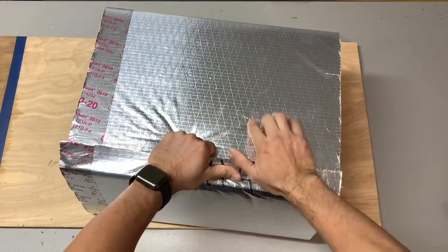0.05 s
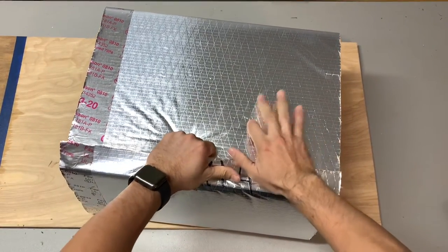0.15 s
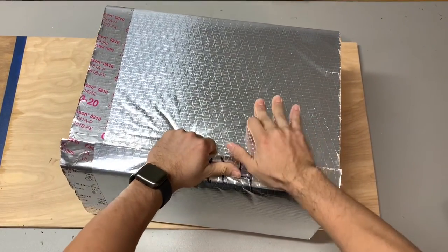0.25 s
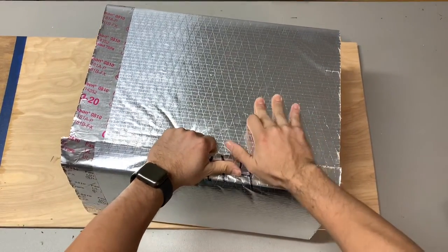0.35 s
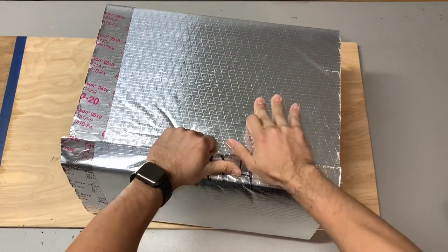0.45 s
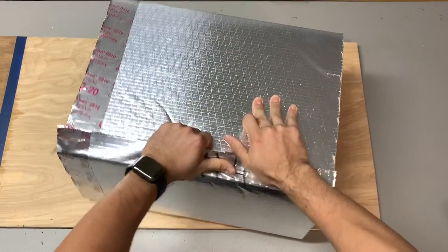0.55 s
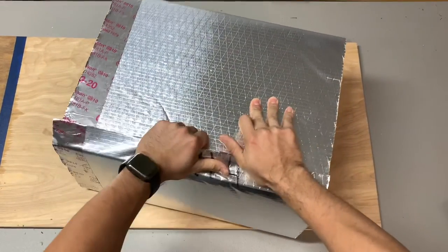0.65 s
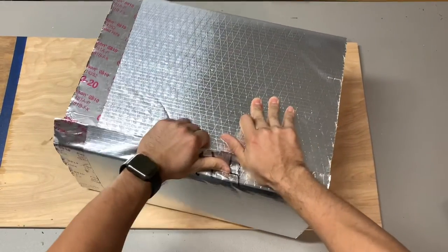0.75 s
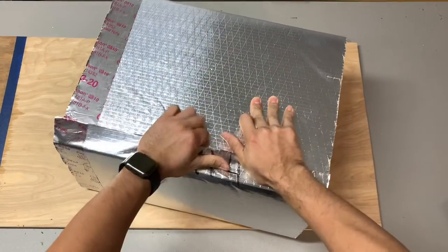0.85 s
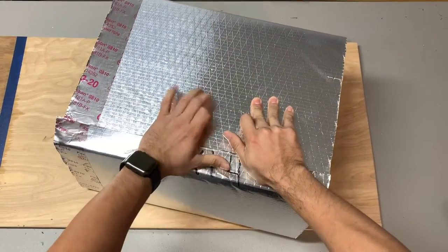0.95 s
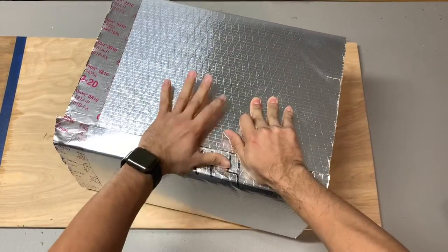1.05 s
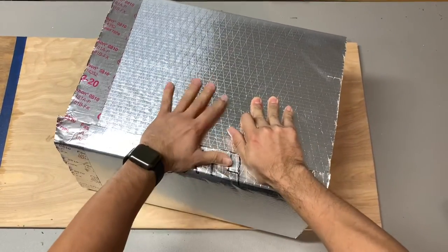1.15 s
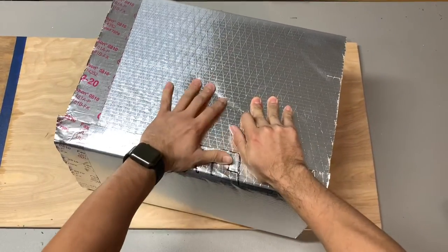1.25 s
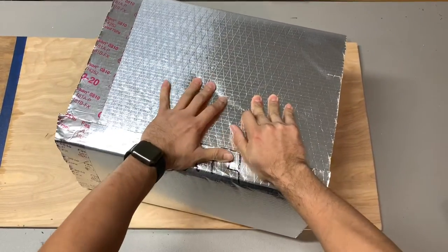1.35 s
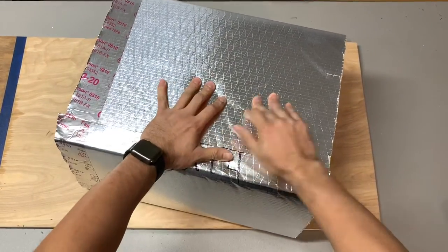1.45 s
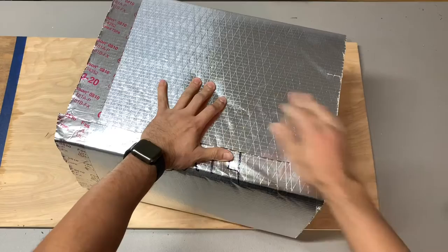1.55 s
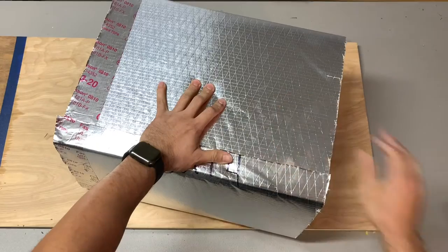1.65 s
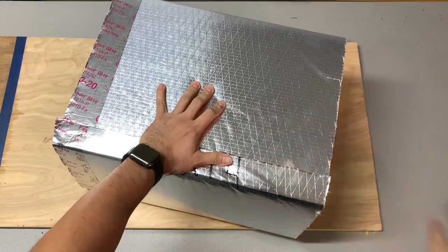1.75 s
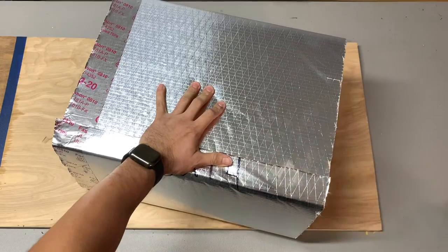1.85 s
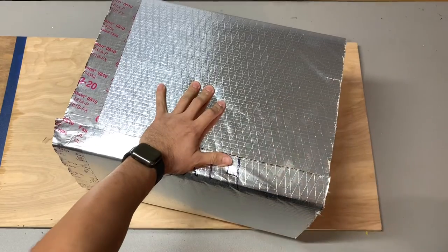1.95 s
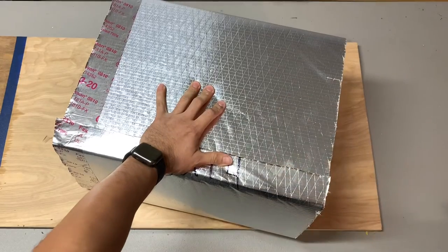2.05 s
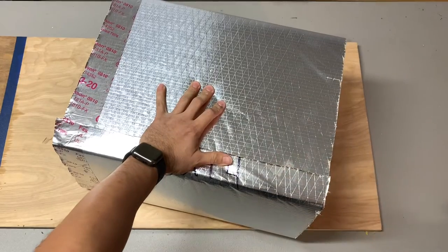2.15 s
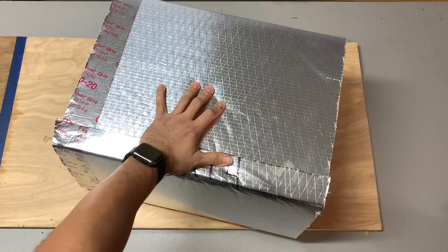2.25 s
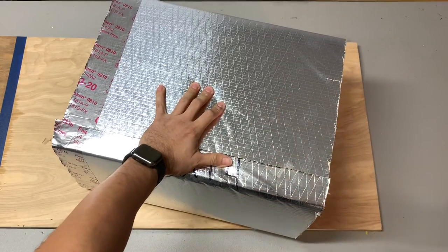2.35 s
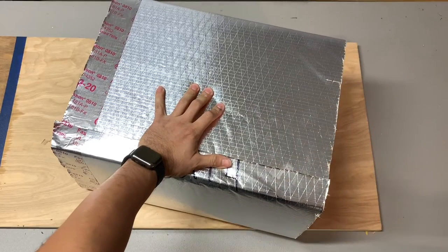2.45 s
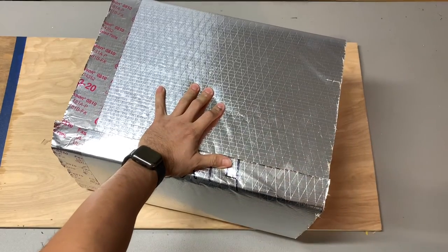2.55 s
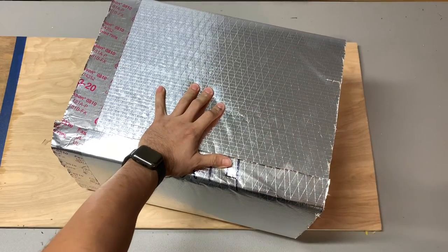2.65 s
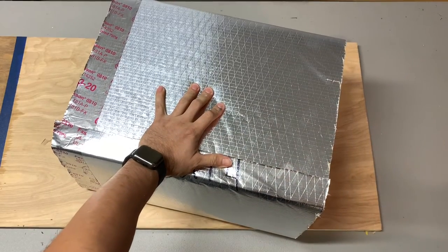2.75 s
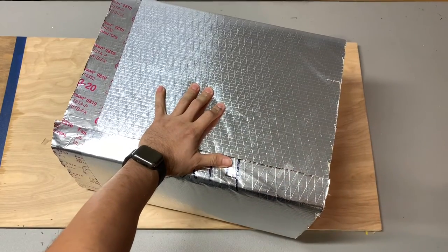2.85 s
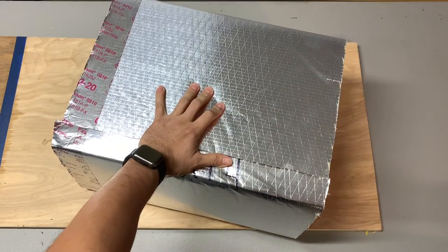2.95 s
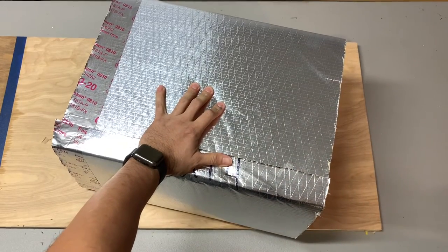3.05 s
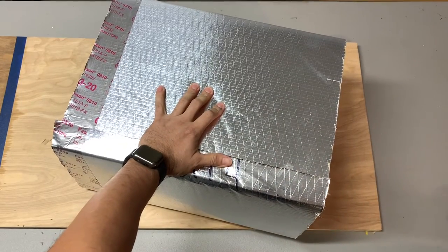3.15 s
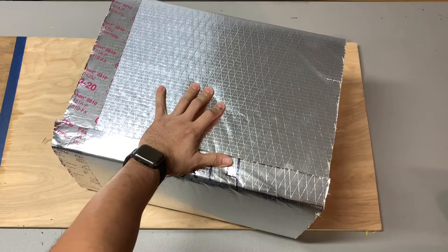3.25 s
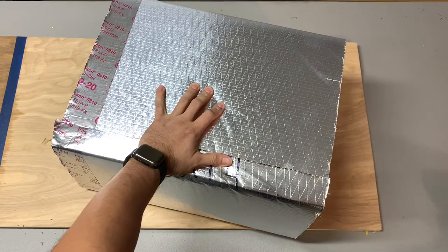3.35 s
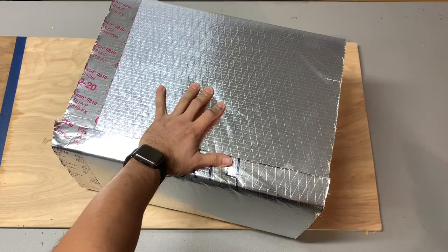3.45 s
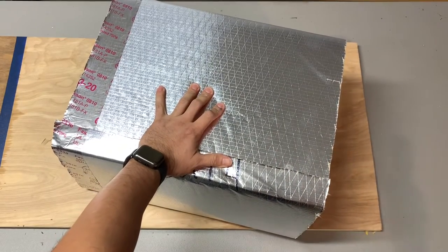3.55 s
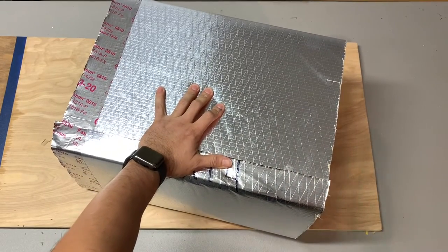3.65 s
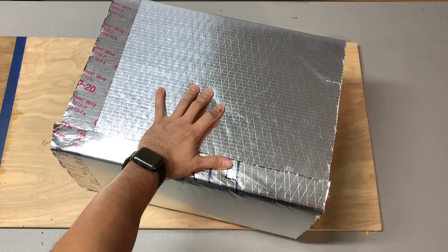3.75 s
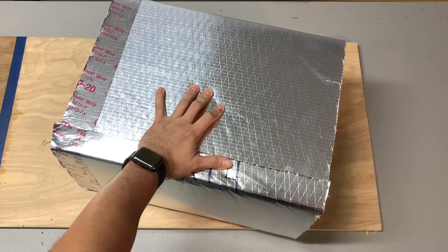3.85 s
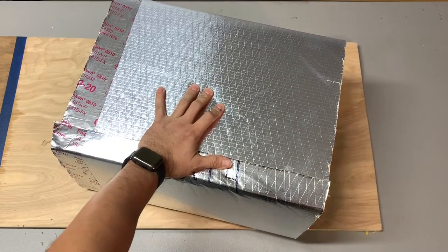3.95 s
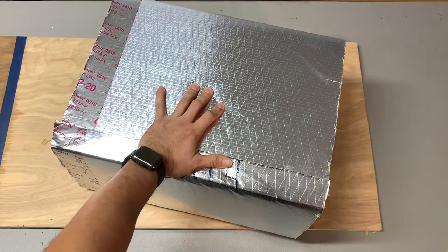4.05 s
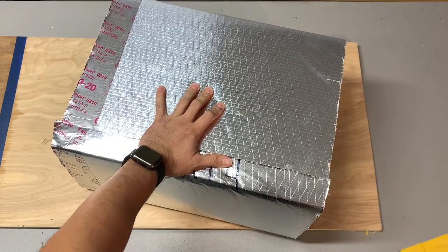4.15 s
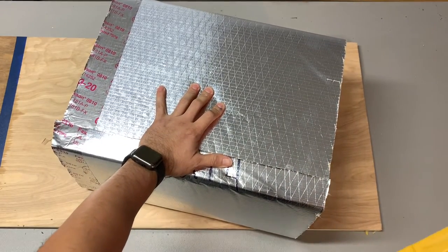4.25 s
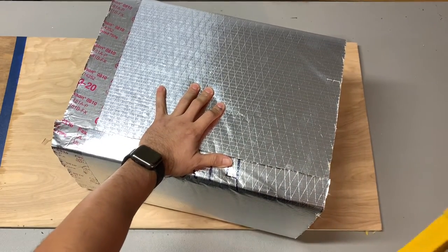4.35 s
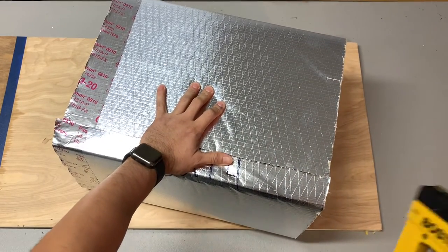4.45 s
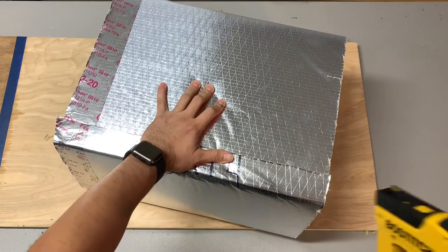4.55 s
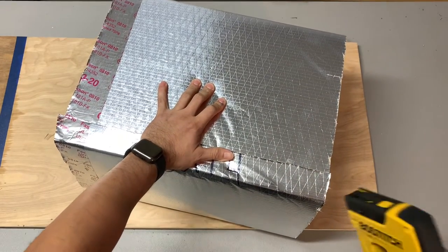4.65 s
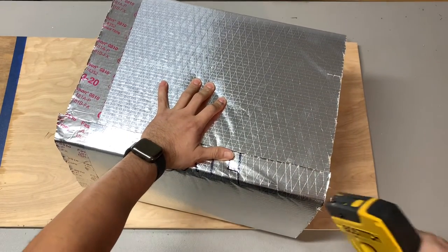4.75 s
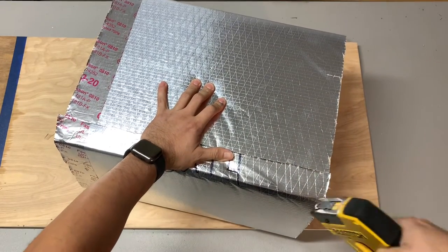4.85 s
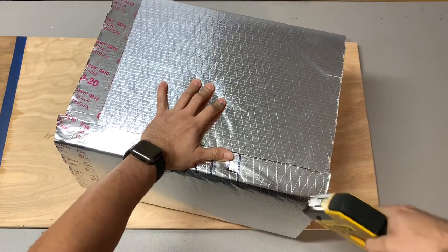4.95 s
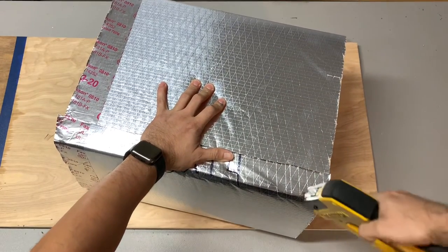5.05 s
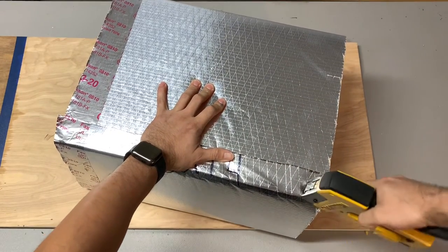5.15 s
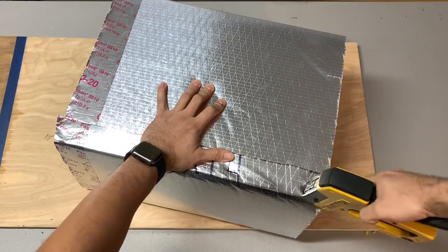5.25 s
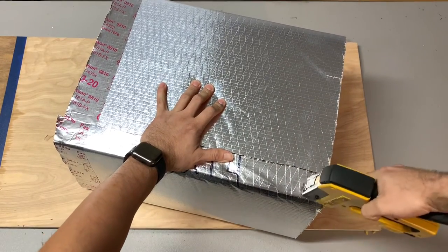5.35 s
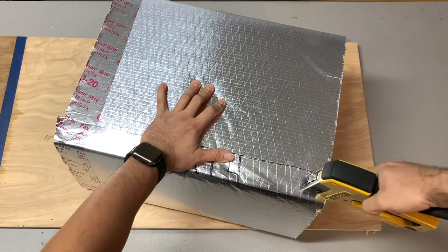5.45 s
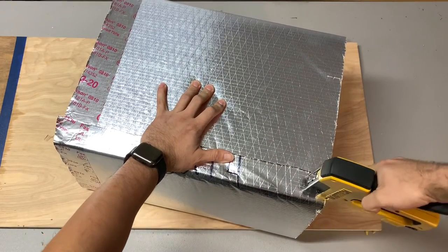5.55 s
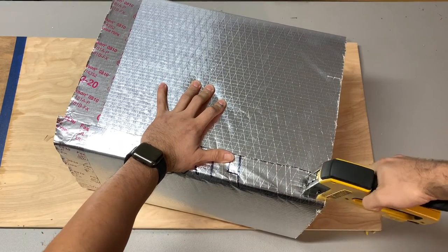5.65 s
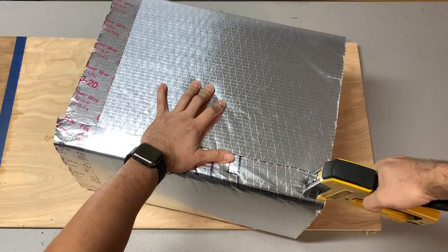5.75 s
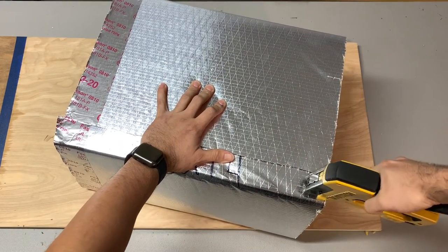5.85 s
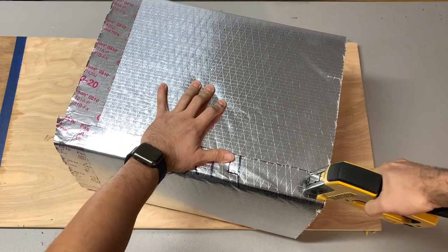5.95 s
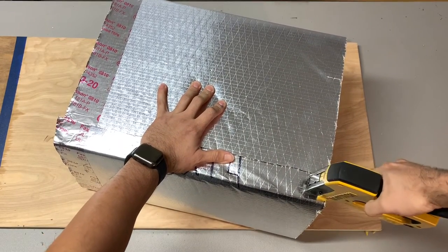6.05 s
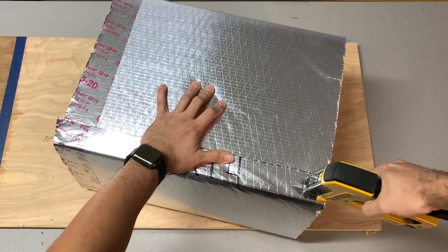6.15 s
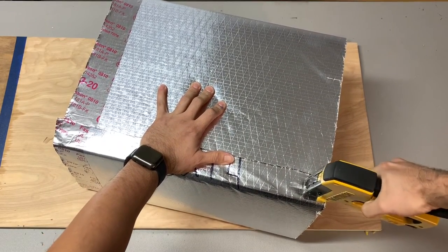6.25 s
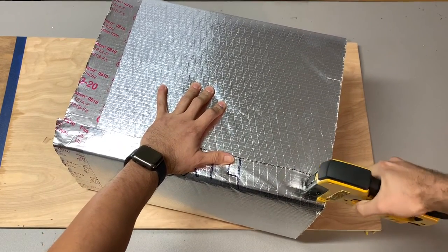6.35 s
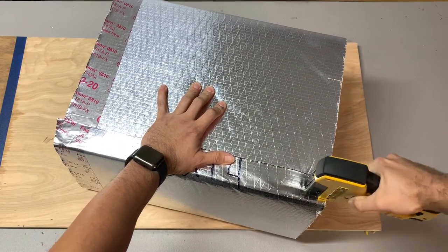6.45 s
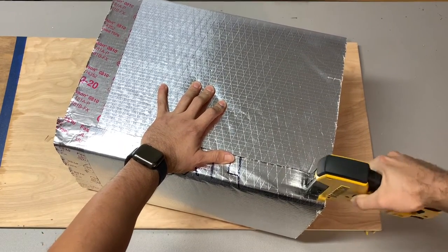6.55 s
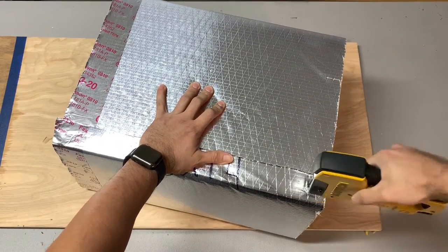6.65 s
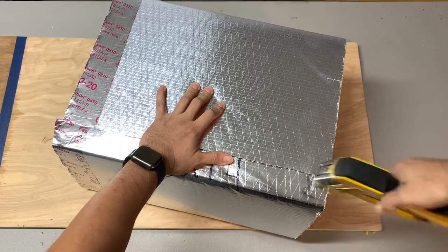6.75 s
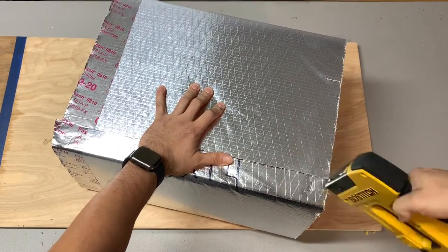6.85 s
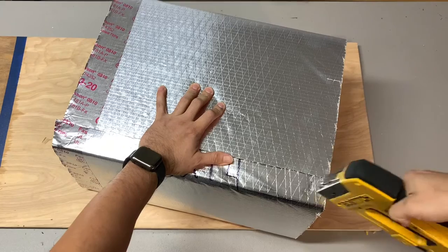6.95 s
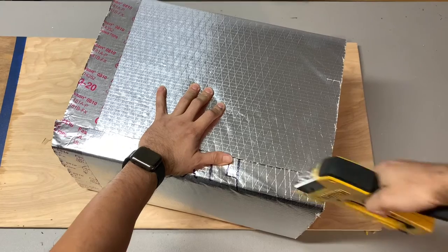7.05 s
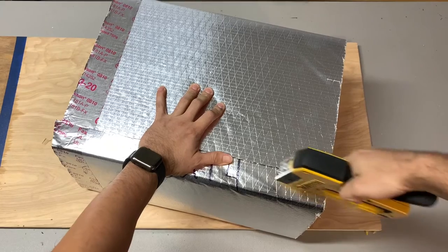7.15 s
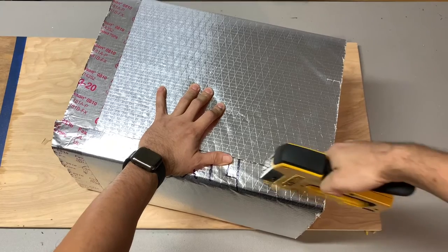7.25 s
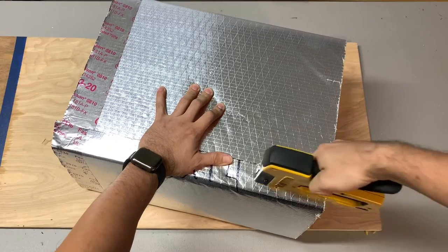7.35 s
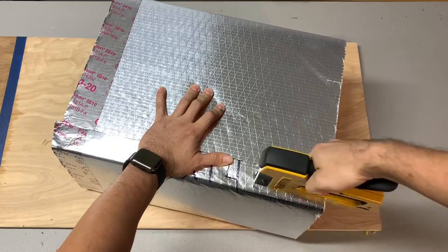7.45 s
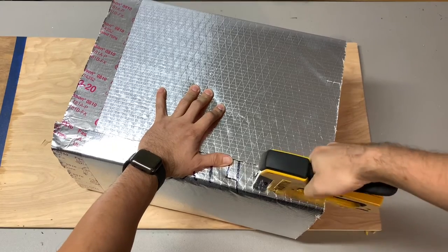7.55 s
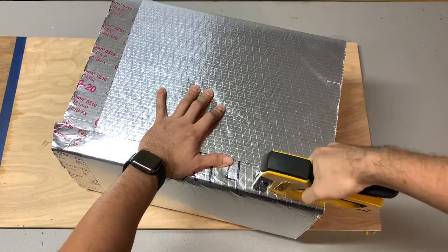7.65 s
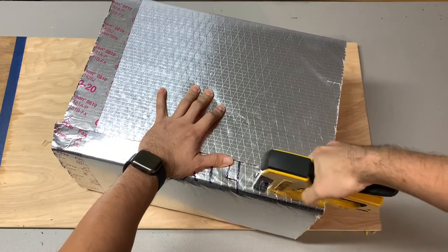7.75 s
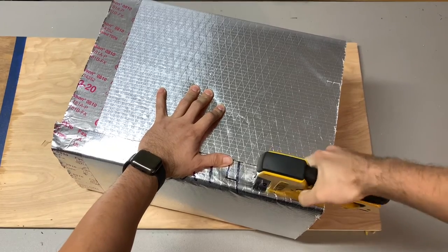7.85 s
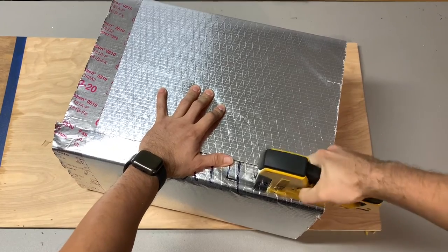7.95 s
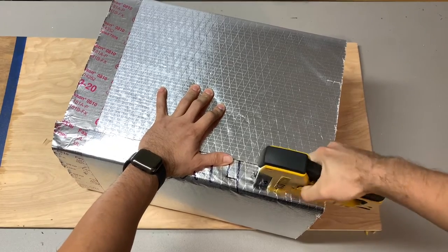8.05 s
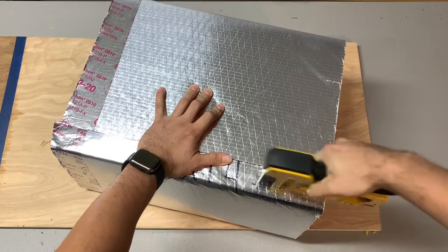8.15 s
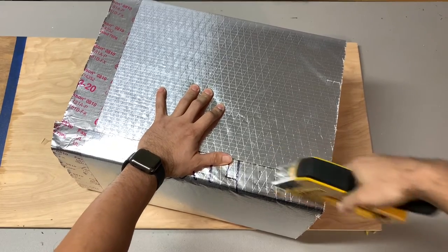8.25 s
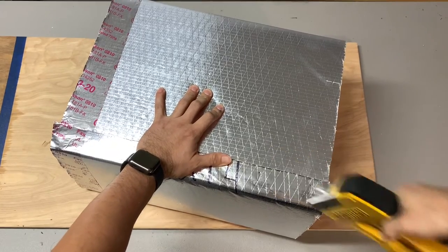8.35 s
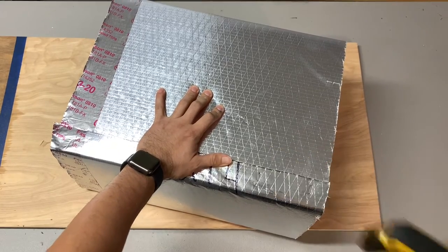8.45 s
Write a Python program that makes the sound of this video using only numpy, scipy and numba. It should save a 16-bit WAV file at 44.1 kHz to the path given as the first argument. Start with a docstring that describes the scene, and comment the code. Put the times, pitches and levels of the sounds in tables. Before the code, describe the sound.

Close stereo pickup of handwork on a bench: crinkling foil, soft dull pats and one strong hollow thump, then quiet. A quick run of woody knocks with a thin hiss comes off to one side, followed by bright steel ticks and a rattle. The stapler's nose settles softly on the board, then two sharp staple shots snap loudly, well separated, each leaving a metallic, roomy tail before near silence.

```python
"""Hands rub and pat foil-faced board in an echoing workshop: noise bands swell, creases crackle, hollow knocks ring.
A wooden knocking comes a little from one side, then the tool clicks and rattles: noise bursts ring steel modes.
A hand stapler drives a staple: scrape, crack, board knock and falling thump, with a long echo; a low hum swells.
A second, like shot follows. Two ports pick it all up; a compressor turns the loud moments down."""
import sys
import numpy as np
from scipy import signal
from scipy.fft import rfft, irfft, next_fast_len
from scipy.io import wavfile
from scipy.ndimage import uniform_filter1d, map_coordinates
from numba import njit

SR = 44100
rng = np.random.default_rng(int(sys.argv[2]) if len(sys.argv) > 2 else 0)


def int16_out(signal):
    """Quantize to a 16-bit WAV file."""
    q = np.round(np.clip(np.atleast_2d(signal).T, -1, 1) * 32767)
    wavfile.write(sys.argv[1], SR, q.astype(np.int16))


def field_ratio(decibels):
    """Amplitude ratio for a level in dB (20 dB per decade); scalars and array-likes work."""
    return 10 ** (np.asarray(decibels, dtype=float) / 20)


N = 375291

# Noise colours: f/Hz, relative level/dB
DEEP_TONE = [(18, -21.5), (30, -20.5), (65, 2), (81, 3), (107, -14), (130, -9), (170, -6.5), (290, -120)]
BOARD_TONE = [(59, -29), (100, 1), (156, -6), (221, 4.5), (279, -4), (334, -1), (520, -14.5), (680, -35),
              (1140, -120)]
RUB_TONE = [(260, -37.5), (450, -13.5), (682, -8), (980, -9.5), (1250, -10), (2300, -8.5), (2990, -14),
            (5060, -120)]
RUSTLE_TONE = [(1180, -63.5), (2000, -24.5), (2520, -2), (2970, -4), (3660, 1), (4840, 2), (5510, -1.5),
               (7200, -9.5), (9360, -73.5), (15800, -120)]
FIZZ_TONE = [(5800, -24.5), (6800, -1.5), (7600, -13), (8800, 9), (11000, 2.5), (13000, 2.5), (15600, 2.5),
             (16400, -45)]
SLIDE_TONE = [(1900, -27.5), (2350, -5), (2550, -11), (2650, -6), (2850, -1), (3150, -4), (3900, -38.5)]
# Background: t/s, level/dB
BACKGROUND = [(0, -58.5), (0.7, -62), (1.3, -63.5), (1.5, -70), (1.93, -74.5), (2.05, -61), (2.45, -71),
              (2.64, -77), (2.78, -76), (3.25, -66), (3.92, -68), (4.25, -65), (5.2, -68), (6.25, -65),
              (6.9, -73), (7.11, -79), (7.2, -73), (7.33, -76), (7.45, -71), (7.6, -70), (7.9, -69.5),
              (8.3, -78.5), (8.5, -78.5)]
# Deep, board, rub, rustle, fizz parts over the background level: level/dB
BACKGROUND_MIX_DB = [2.5, -4, -0.5, -3.5, 1.5]
# In the swell tables below, rise and fall are times per 20 dB, never under 4 ms.
# Low hum: peak t/s, level/dB, rise/s, fall/s
HUM = [(6.36, -48, 0.1, 0.45), (6.52, -47, 0.4, 0.2348)]
# Something heavy shifting on the bench: peak t/s, board level/dB, rise/s, fall/s, deep part over it/dB
SHOVES = [(0.05, -57, 3, 0.4, 6.5), (0.36, -38, 0, -0.06, -12), (0.549, -58, 2, -0.5, -13),
          (1.12, -52, 0.2, 0.0031, 6), (1.38, -61.5, 0.5, 0.94, 3), (1.965, -46, -0.09, 0.51, -2),
          (2.14, -51, 0.1107, 0.35, 4.5), (2.28, -48, 0.326, 0.0548, -5), (2.692, -42.5, -0.04, 0.17, -11),
          (2.94, -43.5, 0.1193, 0.24, 4), (3.05, -62, 0.83, 1.58, -17), (4.49, -55, 0.32, 0.3116, -1.5),
          (5.05, -57, 0.664, -0.1, -2), (5.321, -61, 0.9, 0.6234, 3.5), (7.53, -68.5, 0.45, 1.1, -5.5),
          (7.668, -57.5, -0.5, 0.66, -15), (7.8, -46.5, -0.05, 0.092, 8)]
# Palms rubbing the foil: peak t/s, level/dB, rise/s, fall/s, brightness/dB
RUBS = [(0.17, -45, 0.3, 0.2, -8), (0.38, -50, 0.2, 0.54, -24), (0.47, -41.5, 0.08, 0.12, 3),
        (0.54, -46.5, 0.5, 0.11, -2), (0.82, -53.5, 0.55, 0.02, 6.5), (1.38, -59.5, 0.33, -0.1, -1.5),
        (1.64, -57.5, 0.23, 0.2, -7.5), (2.3, -52.5, 0.23, 0.1804, -9.5), (2.891, -51, 0.1642, 0.27, -7),
        (5.049, -70, 0.02, 1.3, 13.5), (7.678, -61, 0.29, 0.5002, 8.5)]
# What a rub gives to board, rub, rustle, fizz: level/dB
RUB_MIX_DB = [-1, -0.5, -5, -0.5]
# Share of the rub's brightness in each of these four parts [1]
RUB_BRIGHTNESS_SHARES = [-.2, -0.034, 0.36, 1.23]
# Sleeve or tool grip swishing through the hand: peak t/s, level/dB, rise/s, fall/s, fizz over it/dB
SWISHES = [(0.02, -55, 4, 0.85, 9.5), (0.95, -64.5, 2, 0.98, 14.5), (1.1, -59, 0.8, 0.62, 10),
           (3.2, -67.5, 1.9, 0.4, -19), (3.78, -59, 0.5, 3.3, -2), (4.38, -58.5, 1.5, 1, -5),
           (4.74, -55.5, 0.5, 0.86, -7.5), (4.93, -56, .02, 0.53, -17), (5.76, -63.5, 0.4, 0.23, 16),
           (6.25, -58, 0.5, 0.47, 7.5), (7.52, -66.5, 0.15, 1.2, 3.5)]
# Something sliding, a narrow hiss: peak t/s, level/dB, rise/s, fall/s
SLIDES = [(1.955, -55, .006, 0.08), (2.28, -60, 0.3, 0.15), (2.683, -48, .004, .22), (2.88, -58, .08, .14)]
# Staple strip rattling in the magazine: t/s, relative level/dB, centre f/Hz, treble/dB, t60/s
RATTLES = [(3.9608, -27, 4302, -19, 0.21567), (6.591, -33, 2400, -4, 0.22), (8.06, -41, 3596, -4.5, 0.1)]
# Palms and tool nose scuffing the foil: t/s, level/dB, body f/Hz, t60/s, fizz/dB
SCUFFS = [(0.0688, -37, 1200, 0.03088, -14), (0.179, -42, 866, 0.175, -15), (0.125, -48, 898, 0.046, -14),
          (0.2905, -40.5, 795, 0.024, -25), (0.348, -40.5, 640, 0.3, -23.5),
          (0.401, -41, 1000, 0.23, -10.5), (0.438, -38, 950, 0.14, -19.5), (0.5, -39, 1000, 0.092, -7.5),
          (0.726, -35.5, 2100, 0.084, 21), (0.794, -33, 1630, 0.073, 8.5), (.8, -43.5, 687.1, 0.102, -9.5),
          (1.011, -30, 733, 0.037, -13), (1.014, -39, 1490, 0.1228, -21), (1.25, -47, 1100, 0.054, -4),
          (1.345, -46.5, 600, 0.046, -8), (2.68, -41.5, 570, 0.1694, -32), (4.967, -52, 1900, 0.19, -12.5),
          (4.979, -49, 670, 0.14, -9.5), (5.009, -50, 876, 0.0606, -3.5), (5.207, -57.5, 706, 0.1, -11),
          (5.27, -59.5, 2060, 0.22, -14.5), (5.293, -51.5, 2140, 0.13, -22),
          (5.308, -44.5, 906, 0.049, -16), (5.909, -59.5, 1780, 0.064, -4.5),
          (5.932, -58.5, 1498, 0.09, -16), (6.272, -41.5, 467, 0.081, -21.5),
          (7.018, -61, 797.4, 0.051, -16), (7.246, -62, 700, 0.03853, -20.5),
          (7.656, -44.5, 604.2, 0.031, -20), (7.757, -43, 1900, 0.11, -11.5),
          (7.7635, -38, 544.4, 0.04237, -14)]
# Clicks of tool, handle and foil: t/s, peak level/dB, ring f/Hz, relative body/dB, echo/dB
CLICKS = [(0.071, -34.5, 1300, -6, -15), (0.292, -36, 750, -8, -15), (0.3484, -42, 900, -12, -9),
          (0.849, -33, 8930, -18, -10), (0.8656, -38, 9880, 5, -14.5), (0.903, -47, 9500, -14.5, -10),
          (1.2529, -47, 11620, 14, -6), (1.372, -46, 10100, 0.5, -23), (1.9482, -44, 4300, 8, 7.5),
          (2.678, -42, 3000, -35, 7.5), (2.8703, -51, 2820, -16, 10), (2.879, -49.5, 12700, -20, -14),
          (2.9036, -45, 11000, -22, -10), (2.949, -54, 10530, -20, -7), (3.0543, -46, 11900, -8, -4.5),
          (3.109, -56, 11000, -26, -10), (3.3282, -34, 4089, -9.5, -4.5), (3.4497, -48, 11090, -20, -7),
          (3.63, -49, 10400, -20, -10), (3.7005, -59, 13000, 11, -21), (3.712, -43, 3000, -3, -9),
          (3.7161, -28.5, 10200, -7, -5), (3.717, -34, 3570, -9.5, -4), (3.9268, -40.5, 4307, 1, 0.5),
          (3.9544, -43.5, 4840, -36, -8.5), (3.9615, -23, 4870, -5, -3), (4.02, -38, 3300, -7, -12),
          (4.058, -33.5, 2890, 9, -15), (4.317, -35, 5700, 8, -5.5), (4.5424, -49, 11190, 11, 5),
          (5.078, -41, 10200, -37, -16), (5.13, -44, 10200, -30.5, -16.5), (5.215, -47.5, 9700, -20.5, -10),
          (5.516, -52.5, 10300, -5, -3.5), (5.697, -50, 9753, -11.5, -13.5), (5.9658, -39, 4400, 9.5, -5.5),
          (6.2708, -21.5, 10900, -13, 8.5), (6.2726, -28.5, 4400, -2, -4.5), (6.275, -29, 2400, -1, -4.5),
          (6.5894, -25.5, 7330, 0, 1.5), (7.026, -58.5, 2310, -3, -12), (7.1276, -44, 4749, 7, -7),
          (7.6086, -43.5, 1700, -25.5, -14), (7.6571, -32.5, 10400, -11, -13),
          (7.7624, -28, 12990, -20.5, 2), (7.7625, -41.5, 2203, -14.5, 0), (8.057, -37, 3716, 1, -20),
          (8.4829, -57.5, 5410, 4.5, 3)]
# Hollow knocks: t/s, level/dB, f/Hz, box notes/dB, t60/s
KNOCKS = [(0.077, -26.5, 184, -9, 0.0434), (0.198, -29, 221, -11, 0.11), (0.353, -42.5, 330, 8.5, 0.28),
          (0.78, -40, 202.6, -19, 0.1982), (0.797, -37, 365.5, -9, 0.06),
          (0.818, -26.5, 241, -20.5, 0.0274), (1.023, -16, 176, -6.5, 0.18), (1.374, -46, 231, 1, 0.03),
          (1.964, -39.5, 214.5, -28, 0.4), (2.03, -36, 205.4, -18, 0.17), (2.6836, -17.5, 385, -8.5, 0.012),
          (2.6954, -24, 344.5, -11, 0.08), (2.7186, -30, 387.3, -16, 0.03), (2.729, -26, 355, -11, 0.033),
          (2.7441, -32.5, 422, -12, 0.13), (2.7596, -32.5, 407, -16, 0.0373), (2.773, -40.5, 344, -3, 0.18),
          (2.813, -41.5, 402, -22, 0.1), (2.863, -45, 197, -15.5, 0.5), (2.886, -49.5, 226.7, 0.5, 1.3),
          (2.967, -36, 220, -11.5, 0.35), (5.009, -38.5, 295, -15.5, 0.05), (5.022, -34, 267, -19, 0.03),
          (5.318, -39.5, 294.2, -7, 0.06), (5.985, -51.5, 233, -17.5, 0.2), (7.256, -52, 122.4, -5, 0.05)]
# Shots: blow t/s, scrape/dB, frame's low ring/dB, knock/dB, thump/dB, final thump f/Hz, thump delay/ms
SHOTS = [(6.3028, -7.5, 7.5, -4.5, -0.5, 75.28, 1.6), (7.7887, -12.5, -4.5, 2.5, -1.5, 180, 2.7)]
# Steel frame above its low ring: f/Hz, width/Hz, level/dB
FRAME = [(2358, 290, 2.5), (2400, 3600, -5), (4400, 750, 2.5), (7360, 440, -11.5)]
# Driver blade hitting its stop: f/Hz, width/Hz, level/dB
STOP = [(1700, 150, 2.5), (5160, 3000, -24), (9500, 1900, 13.5), (14433, 1100, 4.5)]
# Board under the stapler's nose: f/Hz, width/Hz, level/dB
BOARD = [(136.06, 75, 4.5), (444.4, 150, 1.5), (640, 64, 7), (910, 55, -4.5), (1077, 33, 2.5),
         (1610, 26, -4.5), (1552, 200, -3), (1820, 63, -2), (2090, 55, -5), (2520, 180, -6)]
# Thin steel parts of the tool: f/Hz, width/Hz, level/dB
STEEL = [(2400, 84, -4), (2882, 150, -19), (3280, 160, -2), (3893, 45, 10), (4560, 78, 9), (4870, 17, 0),
         (6835.3, 99, -18), (7643, 97, -10.5), (8730, 92, -14), (9790, 78, 5), (10200, 310, 9),
         (12100, 25, -17.5)]
# Whole shot as it reaches the walls: f/Hz, relative level/dB
BANG = [(150, -19.5), (400, -15), (600, -11), (900, -4), (1350, 2.5), (1750, -2.5), (2350, 0), (2750, -4.5),
        (3300, -5), (4500, 1), (5500, -1.5), (6500, 1), (10000, 5.5), (16000, -8.5)]
# Workshop echo: f/Hz, t60/s, relative level/dB
SHOP = [(150, 0.88, -1.5), (473, 0.62, 5.5), (1200, 0.7, -0.5), (3000, 0.66724, 1), (6949, 0.69, -8.5),
        (10400, 0.5683, -9), (13516, 0.17, -2), (16000, 0.61, -7.5)]
# Left-right correlation of the noise layers: f/Hz, correlation [1]
ALIKE = [(30, 0.9), (100, 0.974), (350, 0.791), (800, 0.11), (2000, 0.099), (7000, 0.03)]
# Working hand's place: t/s, lag of the left side/ms
HAND = [(0, -.08), (1.5, -.08), (1.9, .19), (4.4, .19), (4.9, 0), (8.5, .03)]
# The two ports: f/Hz, left over right/dB
PORTS = [(150, 0), (800, 2), (3000, .5), (5800, -2.5), (7500, -1.5)]
FRAME_HZ = 1480  # the frame's low ring


def unit(x):
    """Scales to rms 1."""
    return x / np.sqrt(np.mean(x ** 2) + 1e-20)


def along(hz_points, values, hz):
    """Interpolates values on a log-frequency axis."""
    return np.interp(np.log(hz + 1), np.log(np.asarray(hz_points) + 1), values)


def curves(rows):
    """One value per sample for each column after the time."""
    s, *columns = np.transpose(rows)
    return [np.interp(np.arange(N) / SR, s, column) for column in columns]


def wobble(rate_hz):
    """Smooth random curve through rate_hz knots a second."""
    knots = rng.standard_normal(int(N * rate_hz / SR) + 4)
    return map_coordinates(knots, [np.arange(N) * rate_hz / SR])


def filtered(x, response):
    """Multiplies the spectrum of x by a complex response of frequency."""
    n = x.shape[-1]
    size = next_fast_len(n + 4096)
    return irfft(rfft(x, size) * response(np.fft.rfftfreq(size, 1 / SR)), size)[..., :n]


def resonances(modes):
    """Causal response of (Hz, width Hz, dB) second-order resonances, of alternating sign."""
    def response(f):
        return sum((-1) ** k * field_ratio(db) * 1j * f * width / (hz * hz - f * f + 1j * f * width)
                   for k, (hz, width, db) in enumerate(modes))
    return response


def impulse(response, energy, size):
    """One blow through a response, scaled to an energy."""
    blow = filtered(np.arange(size) == size // 2, response)
    return blow * np.sqrt(energy / np.sum(blow ** 2))


def add(track, s, sound):
    """Mixes a sound in at a time."""
    part = track[..., round(s * SR):][..., :sound.shape[-1]]
    part += sound[..., :part.shape[-1]]


def placed(track, s, sound):
    """Mixes a sound in with the hand's lag split between the sides."""
    pair = np.broadcast_to(sound, (2, sound.shape[-1]))
    half_lag_s = np.interp(s, *np.transpose(HAND)) / 2000
    add(track[0], s + half_lag_s, pair[0])
    add(track[1], s - half_lag_s, pair[1])


def swells(rows, over_db=0):
    """Power of events that rise to a peak and fall at steady dB rates, each changed by over_db."""
    s, db, rise_s, fall_s = np.array(rows).T[:4, :, None]
    t = np.arange(0, N, 64) / SR
    before = (s - t) / np.maximum(rise_s, .004)
    after = (t - s) / np.maximum(fall_s, .004)
    level_db = db + np.reshape(over_db, (-1, 1)) - 20 * np.maximum(before, after)
    return np.interp(np.arange(N) / SR, t, np.sum(field_ratio(2 * level_db), axis=0))


def rush(tone, grain_db=0, rate_hz=60, patchy_db=0):
    """Stereo noise of rms 1, roughened by quick level changes and time-frequency patches of random gain."""
    noise = rng.standard_normal((2, N)) * field_ratio(grain_db * wobble(rate_hz))
    z = signal.stft(noise, nperseg=512)[2]
    patches = uniform_filter1d(rng.standard_normal(z.shape[1:]), size=3, axis=0)
    patches = uniform_filter1d(patches, size=12, axis=1)
    pair = signal.istft(z * field_ratio(patchy_db * unit(patches)), nperseg=512)[1][:, :N]

    def mid_side(hz):
        # this angle gives the wanted left-right correlation
        angle = np.arccos(np.clip(along(*np.transpose(ALIKE), hz), -1, 1)) / 2
        return field_ratio(along(*np.transpose(tone), hz)) * [np.cos(angle), np.sin(angle)]

    mid, side = filtered(pair, mid_side)
    return unit(np.array([mid + side, mid - side]))


def background(part):
    """Power of one part of the background, following its level curve."""
    return field_ratio(2 * (curves(BACKGROUND)[0] + BACKGROUND_MIX_DB[part]))


def rumble():
    """The building's deep noise, fed by shoves on the bench, and a brief wavering hum near 43 Hz."""
    hum = np.sqrt(2) * np.sin(2 * np.pi * np.cumsum(43 + 1.5 * wobble(7.8)) / SR)
    deep_power = background(part=0) + swells(SHOVES, np.array(SHOVES)[:, -1])
    return np.sqrt(deep_power) * rush(DEEP_TONE) + np.sqrt(swells(HUM)) * hum


def crackle(rate_hz, spread_db):
    """Creases in the foil pop at random, at random levels, through three broad resonances."""
    pops = (rng.random(N) < rate_hz / SR) * field_ratio(spread_db * rng.standard_normal(N))
    pops *= rng.choice([-1, 1], size=N)
    return unit(filtered(pops, resonances([(950, 500, 8.5), (1900, 560, -2.5), (2234, 3500, -8.5)])))


def handling():
    """Skin and cloth slide on foil: the board rumbles, the foil rustles, crackles and fizzes; a slide hisses."""
    bright_db, fizz_db = np.array(RUBS)[:, -1], np.array(SWISHES)[:, -1]
    board_power, rub_power, rustle_power, fizz_power = [
        swells(RUBS, db + share * bright_db) + background(part=k + 1)
        for k, (db, share) in enumerate(zip(RUB_MIX_DB, RUB_BRIGHTNESS_SHARES))]
    board_power = board_power + swells(SHOVES)
    rustle_power = rustle_power + swells(SWISHES)
    fizz_power = fizz_power + swells(SWISHES, fizz_db)
    board = np.sqrt(board_power) * rush(BOARD_TONE, grain_db=-2.0, rate_hz=25)
    rub = rush(RUB_TONE, grain_db=1.0, rate_hz=75, patchy_db=3.5) + 0.58 * crackle(rate_hz=350, spread_db=2.5)
    rub = np.sqrt(rub_power) * rub
    rustle = np.sqrt(rustle_power) * rush(RUSTLE_TONE, grain_db=1.5, rate_hz=90, patchy_db=1.6)
    fizz = np.sqrt(fizz_power) * rush(FIZZ_TONE, grain_db=2.2, rate_hz=150, patchy_db=1.2)
    slide = np.sqrt(swells(SLIDES)) * rush(SLIDE_TONE, grain_db=0.0, rate_hz=86)
    return board + rub + rustle + fizz + slide


def scuffs(near, far):
    """A scuff is a soft-edged crunch of many small creases, coloured by the board."""
    t = np.arange(SR // 6) / SR
    for s, db, hz, t60_s, fizz_db in SCUFFS:
        crease_db = 2.1 * rng.standard_normal(len(t) // 50 + 1)
        creases = rng.standard_normal(len(t)) * np.repeat(field_ratio(crease_db), repeats=50)[:len(t)]

        def colour(f):
            body = resonances([(hz, 1.1 * hz, 0)])(f) ** 2 * (1 + 0.19 * resonances(BOARD)(f))
            return body + resonances([(2300, 1500, -18), (10000, 6000, fizz_db)])(f)

        stroke = (1 - np.exp(-t / (0.066 * t60_s))) * field_ratio(-60 * t / t60_s)
        sound = field_ratio(db) * unit(filtered(creases, colour)) * stroke / stroke.max()
        placed(near, s, sound)
        add(far, s, sound * field_ratio(-11.5))


def rattles(near, far):
    """Loose steel chatters and rings the thin parts of the tool."""
    t = np.arange(SR // 4) / SR
    for s, db, hz, treble_db, t60_s in RATTLES:
        # uneven contacts, 3 ms each
        bounces = np.repeat(rng.standard_normal(len(t) // 150 + 1), repeats=150)[:len(t)]
        chatter = rng.standard_normal((2, len(t))) * field_ratio(2 * bounces - 60 * t / t60_s)
        thin_parts = [(c, 2.2 * width, level - 9.5) for c, width, level in STEEL]
        colour = resonances([(hz, 0.51 * hz, 0), (9000, 6000, treble_db)] + thin_parts)
        sound = field_ratio(db) * filtered(chatter, colour) * np.sqrt(SR / hz)
        placed(near, s, sound)
        add(far, s, sound[0] * field_ratio(-10.5))


def clicks(near, far):
    """A sharp tick and a brief buzz excite a broad ring, a flat crack and the body of the thing touched."""
    t = np.arange(SR // 12) / SR
    for s, db, hz, body_db, echo_db in CLICKS:
        tick, buzz = field_ratio(-60 * t / .006), 0.19 * field_ratio(-60 * t / 0.093)
        contact = 1 - np.exp(-(t / .0004) ** 2)
        burst = rng.standard_normal(len(t)) * contact * (tick + buzz)
        burst[16] += 3  # the first hard contact sets the rings going
        broad = [(FRAME_HZ, 600, body_db - 2), (hz, 0.31 * hz, 0), (2900, 1800, -12), (9000, 16000, -5)]
        narrow = [(hz, 0.026 * hz, 5), (FRAME_HZ, 35, body_db + 9.5)]
        sound = filtered(burst, resonances(broad + narrow))
        sound *= field_ratio(db) / np.sqrt(np.max(uniform_filter1d(sound ** 2, size=100)))
        placed(near, s, sound * field_ratio([[-1.2], [1.2]]))
        echo = impulse(resonances(broad), np.sum(sound ** 2), size=512)
        add(far, s, echo * field_ratio(echo_db))


def knocks(near, far):
    """A soft blow rings a hollow panel, damped ever harder by the hand; the box's two notes ring along."""
    t = np.arange(SR // 3) / SR
    for s, db, hz, box_db, t60_s in KNOCKS:
        box = np.sin(2 * np.pi * 380.4 * t) + 0.24 * np.sin(2 * np.pi * 420.5 * t)
        ring = np.sin(2 * np.pi * hz * t) + field_ratio(box_db - 60 * t / 0.24) * box
        ring *= (1 - np.exp(-t / 0.002)) * field_ratio(db - 60 * (t / t60_s) ** 1.407)
        placed(near, s - .003, ring)
        add(far, s - .003, ring * field_ratio(-13 - 60 * t / 0.065))


def shots(near, far):
    """The sprung driver scrapes down its slot, slams on its stop, knocks and thumps the board."""
    lead_s = .02
    pressed_hz = 345  # the thump's first pitch, under the tool's pressure
    t = np.arange(SR // 5) / SR - lead_s
    after = np.maximum(t, 0)
    for s, scrape_db, low_db, knock_db, thump_db, thump_hz, wait_ms in SHOTS:
        # the scrape grows while the driver gathers speed and ends soon after the blow
        speed = np.exp(-(np.minimum(t + .0022, 0) / .005) ** 2) * field_ratio(-60 * after / .035)
        frame = resonances([(FRAME_HZ, 210, low_db)] + FRAME)
        scrape = unit(filtered(rng.standard_normal((2, len(t))), frame)) * speed * field_ratio(scrape_db)

        hit = np.exp(np.minimum(t, 0) / .0011) * field_ratio(-60 * after / .024)
        crack = unit(filtered(rng.standard_normal((2, len(t))), resonances(STOP))) * hit * field_ratio(2.04)

        blow = np.exp(-((t - .0007) / 0.00018) ** 2) + 0.34 * hit * rng.standard_normal(len(t))
        knock = filtered(blow, resonances(BOARD + [(1000, 1200, -1.7)]))
        knock *= field_ratio(knock_db) / np.abs(knock).max()

        # the pressed board springs back a moment later: its pitch falls as the load comes off
        spring = np.maximum(t - wait_ms / 1000, 0)
        pitch_hz = thump_hz + (pressed_hz - thump_hz) * np.exp(-spring / 0.0041)
        phase = 2 * np.pi * np.cumsum(pitch_hz * (spring > 0)) / SR
        # dies by 60 dB in 5.6 cycles of its final pitch
        thump = -np.sin(phase) * field_ratio(thump_db - 60 * spring * thump_hz / 5.6)
        # the tool is on the right
        add(near, s - lead_s, (scrape + crack) * field_ratio([[-5], [3]]) + knock + thump)

        def bang_response(hz):
            board = field_ratio(knock_db - 3.0) * np.abs(resonances(BOARD)(hz))
            steel = field_ratio(-11.0) * np.abs(resonances(STEEL)(hz))
            return field_ratio(along(*np.transpose(BANG), hz)) * (1 + board + steel)

        bang = impulse(bang_response, field_ratio(2 * 16.5), size=2048)
        add(far, s - 1024 / SR, bang)  # its peak is at mid-length


def workshop(x):
    """Echo of the walls: noise in which each frequency dies at its own speed."""
    hz_points, t60_s, db = np.transpose(SHOP)
    hz, t, z = signal.stft(rng.standard_normal((2, SR)), SR, nperseg=256)
    gain = field_ratio(along(hz_points, db, hz)[:, None] - 60 * t / along(hz_points, t60_s, hz)[:, None])
    gain *= 1 - np.exp(-t / 0.00089)  # the walls take a moment to fill in
    tail = signal.istft(z * gain, SR, nperseg=256)[1]
    tail = tail / np.linalg.norm(tail[0])
    late = np.pad(x, (250, 0))[None]  # echo delay in samples
    return signal.fftconvolve(late, tail, axes=1)[:, :N]


def scene():
    """All sources, near and echoed."""
    near, far = np.zeros((2, N)), np.zeros(N)
    background_and_hands = rumble() + handling()
    scuffs(near, far)
    rattles(near, far)
    clicks(near, far)
    knocks(near, far)
    shots(near, far)
    return near + workshop(far) + background_and_hands


def ports(x):
    """Two ports give bass and middle; the treble is one signal for both sides, 0.2 ms later on the left."""
    sides = np.array([[1], [-1]])

    def treble_share(hz):
        return 1 / (1 + (7300 / (hz + 1)) ** 24)

    def low_response(hz):
        return np.sqrt(1 - treble_share(hz)) * field_ratio(sides * along(*np.transpose(PORTS), hz) / 2)

    def high_response(hz):
        half_lag_rad = np.pi * (hz - 6100) / 4870
        top_cut = 1 + (hz / 16000) ** 120
        return np.sqrt(treble_share(hz) / top_cut) * np.exp(-1j * sides * half_lag_rad)

    return filtered(x, low_response) + filtered(x.mean(axis=0), high_response)


@njit
def follow(power, rise, fall):
    """Running power that rises and falls at its own speeds."""
    out, level = np.empty_like(power), 0.
    for i in range(len(power)):
        level += (power[i] - level) * (rise if power[i] > level else fall)
        out[i] = level
    return out


def compressor(x, knee_db, share, rise_s, fall_s):
    """Takes back a share of every dB over the knee, a moment late."""
    power = np.abs(uniform_filter1d(np.mean(x ** 2, axis=0), size=200))
    level_db = 10 * np.log10(follow(power, 1 / (rise_s * SR), 1 / (fall_s * SR)) + 1e-12)
    return x * field_ratio(-share * np.maximum(level_db - knee_db, 0))


def roll_off(x):
    """The treble ends steeply here."""
    return signal.sosfilt(signal.butter(12, 16840, fs=SR, output="sos"), x)


def record(dry):
    """Ports, compressor and soft ceiling in turn."""
    mix = compressor(ports(dry), knee_db=-29.0, share=0.68, rise_s=0.068, fall_s=0.056)
    mix = mix / (1 + np.abs(mix / .95) ** 4) ** .25
    return roll_off(mix)


dry = scene()
out = record(dry)
int16_out(out)
```